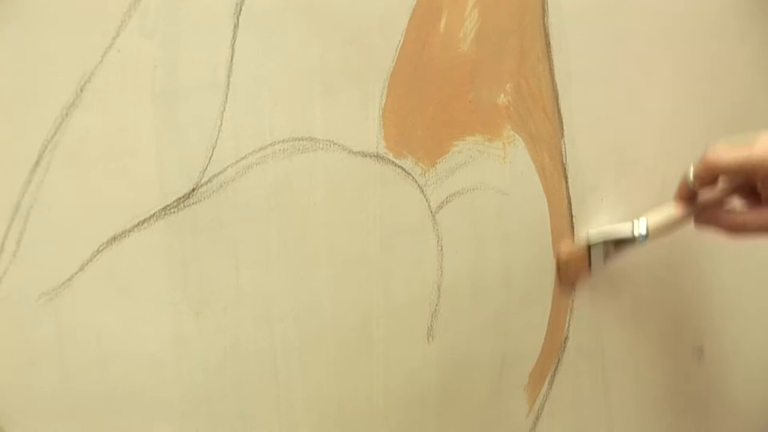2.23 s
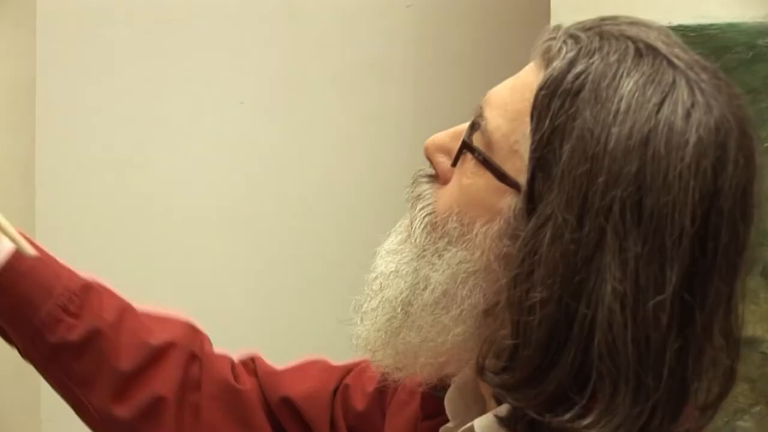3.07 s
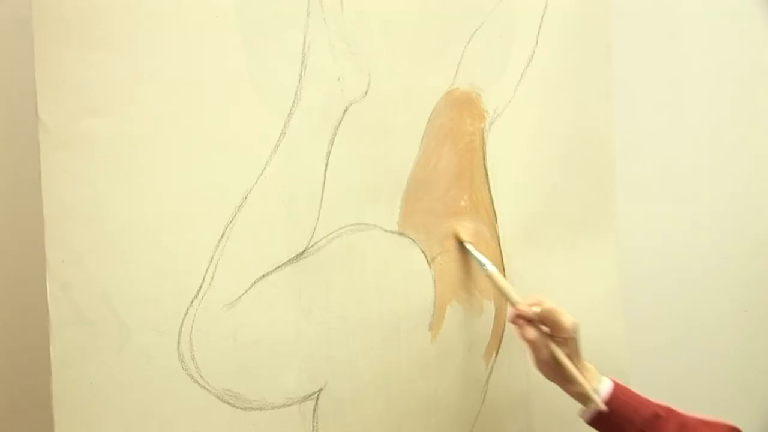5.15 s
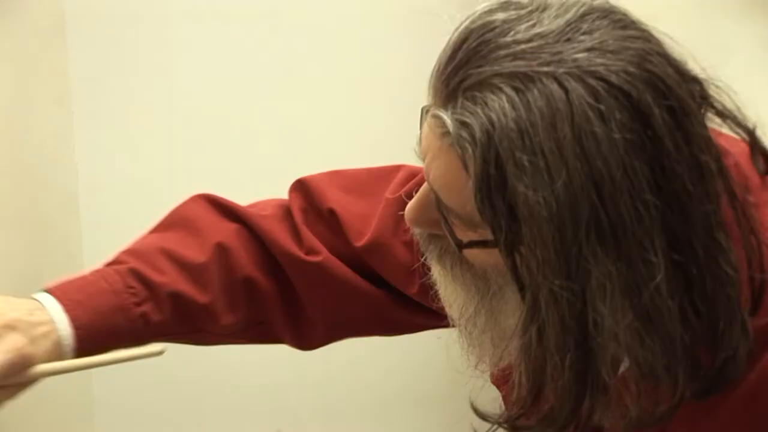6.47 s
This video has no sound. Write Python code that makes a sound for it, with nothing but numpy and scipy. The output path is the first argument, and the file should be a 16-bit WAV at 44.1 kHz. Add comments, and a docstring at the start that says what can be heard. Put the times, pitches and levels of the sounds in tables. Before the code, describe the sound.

Close, dry mono sound of painting on a sheet of paper. Soft brushing swishes come first, around a small handle clatter and deep bumps of the easel. After about three seconds the brush scrubs rapidly to and fro, scratchy and bright, the sheet droning faintly. A softer passage follows, then the loudest brisk strokes, with taps and low thuds, before it falls nearly quiet. Faint room air stays underneath.

```python
"""First come slow, soft brush strokes over a low rumble, with one short rattle; quicker, louder strokes follow.
A bristle brush scrubs paint to and fro over paper on an easel in a quiet studio, close to one microphone.
Thousands of bristle slips, made from uneven noise, hiss, scrape and shake the sheet, which drones in its modes.
Short pushes make the taps of the landing brush and the rattle of its handle, by ringing resonances.
The easel rumbles low when pushed: a wandering low tone plus noise passed through its resonances."""
import sys
import numpy as np
from scipy import signal
from scipy.fft import rfft, irfft
from scipy.io import wavfile
from scipy.ndimage import uniform_filter1d

SR = 44100
rng = np.random.default_rng(int(sys.argv[2]) if len(sys.argv) > 2 else 0)


def output_pcm(signal):
    """Save a mono or channel-first signal as 16-bit PCM at the path in sys.argv[1].

    Samples are clipped to [-1, 1] before scaling.
    """
    pcm = np.clip(np.atleast_2d(signal).T, -1, 1) * 32767
    wavfile.write(sys.argv[1], SR, np.round(pcm).astype(np.int16))


def invert_db(x):
    """Field ratio 10**(x/20) for x, a level in decibels (scalar or array-like)."""
    u = np.asarray(x, float) / 20
    return 10 ** u


N = 298998  # length in samples

# colour of the studio's air and microphone hiss: (frequency [Hz], level per Hz [dB])
STUDIO_COLOUR = [(88, -53), (150, -2.5), (240, -7.5), (315, -7.5), (589, -9), (888, -17), (16000, -26.5)]
# easel legs, the low resonances: (centre [Hz], width [Hz], gain [dB])
LEG_MODES = [(30, 13.7, 3.5), (44, 16, -0.5), (60, 36, -4), (78, 36, -5.5)]
# easel frame, the higher resonances: (centre [Hz], width [Hz], gain [dB])
FRAME_MODES = [(97, 32.4, -0.5), (139, 61, -0.5), (181.4, 62, -1.5), (239, 64, -11)]
# steady rocking while the painter leans in: (time [s], sway drive [dB], frame relative to sway [dB])
LEAN = [(0, -49, -8.5), (.7, -61.5, -4), (1.5, -59, -14), (2.1, -63, -15), (3.15, -66.5, -11),
        (3.3, -57, -12), (3.6, -53.5, -17.5), (3.95, -48.5, -17.5), (4.35, -58.5, -1), (4.5, -51.5, -15),
        (4.9, -53.5, -15), (5.2, -53, 0), (5.5, -50.5, -19), (5.8, -50.5, -13.5), (6.78, -58, -5.5)]
# shoves on the easel:
# (start [s], sway drive [dB], frame relative to sway [dB], rise [s], time to fall by 60 dB [s])
SHOVES = [(0.02, -52, -4.5, 0.027, 1.3), (.24, -40.5, 5, .065, 0.25), (.45, -59, -10, 0.027, 0.68),
          (.93, -65, -10, .05, .9), (1.168, -31, -8.5, 0.025, 0.5), (1.25, -26.5, -33, 0.013, 0.25),
          (1.36, -38.5, -16, 0.024, 0.74), (1.43, -41.5, -26, 0.014, 0.41), (1.6, -55.5, -11.5, .05, 2.5),
          (4.08, -45.5, -10, .02, 0.23), (4.64, -41.5, -10, 0.011, 0.34), (5.868, -30.5, -9.5, 0.017, 0.33),
          (5.97, -47, -6.5, .03, 1.6), (6.21, -44.5, -13.5, 0.025, 1.2), (6.29, -45.5, -1.5, 0.011, 0.25),
          (6.385, -41.5, -7, 0.016, 0.22), (6.5, -53.5, -24, 0.028, 2)]
# resonances of the wooden handle: (centre [Hz], width [Hz], gain [dB])
HANDLE_MODES = [(300, 50, 1), (1290, 90, 1), (2100, 110, -1), (2570, 130, -1), (2800, 150, 0),
                (3280, 200, -7), (4050, 280, -8), (4500, 330, -12), (5600, 500, -21)]
# knocks on the handle: (time [s], drive [dB])
KNOCKS = [(.2845, -36), (0.2871, -27.5), (0.29, -33), (.291, -30), (.293, -25.5), (.2955, -50),
          (0.301, -37), (.3035, -29), (.308, -34), (.311, -31.5)]
# resonances of the paper sheet: (centre [Hz], width [Hz], gain [dB])
SHEET_MODES = [(270, 45, -13), (345, 30, -9), (430, 40, -13), (490, 35, -11), (570, 35, -6), (625, 25, 0),
               (715, 35, -1), (775, 40, -7), (1030, 70, -13)]
# moments when the brush lands: (time [s], drive [dB], bristle tick relative to drive [dB])
LANDINGS = [(3.485, -39.5, -12), (3.758, -30.5, -27), (3.783, -31, -9), (4.082, -32.5, -9.5),
            (4.651, -38, -22), (5.079, -49, -4), (5.19, -38, -25), (5.25, -38, -24), (5.476, -48, -18),
            (5.792, -48, -18), (6.248, -44, -25), (6.387, -49, -20), (6.405, -28.5, -16), (6.423, -40, -22),
            (6.705, -27, -31), (6.707, -33, -12), (6.724, -52, -12)]
# one row a stroke: (start [s], end [s], strength [dB], speeding up [s], slowing down [s])
STROKES = [(-0.016, 0.113, -48, 0.016, 0.16), (0.059, 0.398, -52.5, 0.085, 0.19),
           (0.276, 0.601, -51.5, 0.19, 0.11), (0.536, 0.863, -54, 0.11, 0.15),
           (0.767, 1.299, -48.5, 0.21, 0.16), (1.179, 1.537, -49, 0.28, 0.13),
           (1.49, 1.942, -53, 0.092, 0.2), (1.803, 2.27, -50, 0.28, 0.17), (2.201, 2.648, -52, 0.11, 0.16),
           (2.587, 3.112, -51.5, 0.16, 0.31), (3.163, 3.315, -53.5, 0.081, 0.07),
           (3.285, 3.497, -43.5, 0.069, 0.13), (3.454, 3.685, -40, 0.064, 0.16),
           (3.628, 3.767, -41, 0.077, 0.1), (3.742, 3.856, -44, 0.054, 0.077),
           (3.827, 3.914, -45, 0.057, 0.067), (3.895, 3.993, -42, 0.049, 0.071),
           (3.97, 4.079, -42.5, 0.049, 0.09), (4.053, 4.152, -40, 0.059, 0.071),
           (4.113, 4.483, -50, 0.08, 0.11), (4.437, 4.656, -48.5, 0.14, 0.15),
           (4.632, 4.829, -52.5, 0.042, 0.054), (4.788, 5.093, -55.5, 0.081, 0.18),
           (5.07, 5.272, -51.6, 0.018, 0.08), (5.248, 5.309, -37, 0.0043, 0.055),
           (5.289, 5.479, -40, 0.055, 0.11), (5.445, 5.605, -38.5, 0.06, 0.036),
           (5.583, 5.789, -35.5, 0.073, 0.15), (5.762, 5.947, -37.6, 0.052, 0.078),
           (5.919, 6.096, -35.8, 0.042, 0.18), (6.057, 6.263, -42, 0.07, 0.1),
           (6.224, 6.394, -36, 0.038, 0.2), (6.363, 6.438, -43.5, 0.058, 0.036),
           (6.378, 6.642, -48.5, 0.17, 0.21), (6.7, 6.737, -62, 0.006, 0.021),
           (6.708, 6.861, -58.5, 0.047, 0.038)]
# how the brush is held: (time [s], share of flat side against tips [0-1], pressure on the sheet [dB],
# bite of the stiff hairs [dB], extra drive of the low sheet modes from the place on the sheet [dB])
GRIP = [(0, 0.9, -7, 3, 17), (.2, 0.55, -12, 2, 13), (.36, .7, -15, 5.5, 17), (.5, 0.6, -12.5, -0.5, 16.5),
        (.7, 0.76, -12.5, -2, 12.5), (1.1, 0.5, -13, 3.5, 12), (1.35, .65, -12, -3, 9),
        (1.7, 0.4, -10, 0.5, 8), (2.05, 0.4, -28, -2.5, 8), (2.45, 0.8, -11, -2, 5),
        (2.8, 0.33, -28, -4, 8), (3, 0.6, -11, -2.5, 15), (3.25, 0, -9, -9, 3), (3.4, 0.13, -2, -1, -2),
        (3.6, 0.1, 3, 4.5, -1), (3.79, 0, 8, 2, -5.5), (3.95, 0.2, 2.5, 2.5, -0.5), (4.1, 0.3, 6, 1.5, -1),
        (4.18, 0.2, 8.5, 1.5, -2), (4.32, .15, 0.5, 2.5, 1.5), (4.41, 0.6, 8, 2.5, 8.5),
        (4.55, 0.52, -3, 0.5, 6), (4.71, 0.5, 1, 4.5, 6), (4.78, .7, 6.5, 4, 13.5),
        (4.95, 0.4, -1.5, -3.5, 2), (5.1, 0.8, 2.5, 4, 6), (5.19, .5, 10, 7, 3), (5.3, 0.34, 5.5, 0.5, -3),
        (5.4, 0.3, -5.5, 2, -4), (5.55, 0.2, 4, -3, -4), (5.72, .3, -5, -1, -14), (5.82, .3, 1, 0, -6),
        (5.9, 0.33, 9, 5.5, -4), (6.02, .2, 7, 5, 1), (6.13, 0.36, 4.5, 3, -2), (6.3, 0.04, -4.5, 4, 11.5),
        (6.42, 0.85, 7, 4.5, 11), (6.6, 0.3, -15, -4, 5), (6.72, .4, 5, 6.5, 11), (6.78, .4, 3, -1.5, 11)]
# colour of the hiss of the hair tips: (frequency [Hz], level per Hz [dB])
TIP_COLOUR = [(1500, -15), (2500, -10), (3500, -6), (5000, -1.5), (7500, -2), (10500, 1), (14500, 1.2),
              (15700, -7.5)]
# colour of the hiss of the flat side of the brush: (frequency [Hz], level per Hz [dB])
FLAT_COLOUR = [(1500, -4.5), (3000, -20.5), (5300, -5), (6500, -1.5), (7600, 0), (10000, -2), (13000, -6),
               (15700, -4.5)]
# colour of the scrape of the stiff hairs: (frequency [Hz], level per Hz [dB])
SCRAPE_COLOUR = [(300, -11.5), (600, -1.5), (1100, -2), (1800, -3), (2800, -3), (4500, -5.5), (8000, -20.5)]


def unit(x):
    """Scale to rms 1."""
    return x / np.sqrt(np.mean(x ** 2))


def curve(rows):
    """Draw straight lines between the rows of a timed table, one curve a column."""
    s, *columns = np.transpose(rows)
    return [np.interp(np.arange(N) / SR, s, c) for c in columns]


def colour(x, points):
    """Shape a spectrum by (frequency [Hz], level [dB]) points."""
    hz, db = np.transpose(points)
    f = np.arange(N // 2 + 1) * SR / N + 1  # the 1 avoids log(0)
    gain_db = np.interp(np.log(f), np.log(hz), db)
    return irfft(rfft(x) * invert_db(gain_db), N)


def ring(x, modes):
    """Add up resonances, each ringing at its own pitch, with signs alternating."""
    total = 0
    for k, (hz, width, db) in enumerate(modes):
        b, a = signal.iirpeak(hz, hz / width, fs=SR)
        total = total + (-1) ** k * invert_db(db) * signal.lfilter(b, a, x)
    return total


def walk(rate):
    """Wander at random: rate new levels a second, smoothed twice and scaled to rms 1."""
    k = max(int(SR / rate), 1)
    steps = np.repeat(rng.standard_normal(N // k + 1), k)
    smooth = uniform_filter1d(uniform_filter1d(steps, k), k)
    return unit(smooth[:N])


def slips(spread_db, flicker_db, rate):
    """Make dense tiny slips of uneven size, bunching as hairs catch and let go together."""
    size_db = spread_db * rng.random(N) + flicker_db * walk(rate)
    return rng.standard_normal(N) * invert_db(size_db)


def blows(s, db, decay_s, rough):
    """Give short, fading pushes with some random chatter at the given moments."""
    out, t = np.zeros(N), np.arange(1500) / SR
    chatters = rng.standard_normal((len(s), len(t)))
    for start, size, chatter in zip(s, invert_db(db), chatters):
        out[int(start * SR):][:len(t)] += size * np.exp(-t / decay_s) * (1 + rough * chatter)
    return out


def studio():
    """Faint steady air and microphone hiss is coloured noise."""
    return invert_db(-71.5) * unit(colour(rng.standard_normal(N), STUDIO_COLOUR))


def easel():
    """The legs rock at a wandering pitch under the brush and each shove; the frame rumbles higher up."""
    t = np.arange(N) / SR
    lean_db, lean_frame_db = curve(LEAN)
    # powers add up, so the lean and the shoves are squared here
    sway_power = invert_db(lean_db + 2.0 * walk(14)) ** 2
    frame_power = sway_power * invert_db(lean_frame_db) ** 2
    for s, db, frame_db, rise, t60 in SHOVES:
        onset = np.clip((t - s) / rise, 0, 1)
        fall_db = 60 * np.maximum(t - s - rise, 0) / t60
        shove_power = (onset * invert_db(db - fall_db)) ** 2
        sway_power = sway_power + shove_power
        frame_power = frame_power + shove_power * invert_db(frame_db) ** 2
    rock_hz = 48 * (1 + 0.2975 * walk(30))
    rock = np.sqrt(2) * np.sin(2 * np.pi * np.cumsum(rock_hz) / SR)
    # a broad second resonance rounds off each rumble
    shake = unit(ring(ring(rng.standard_normal(N), LEG_MODES), [(52.0, 76, 0)]))
    rough = slips(spread_db=-4.7, flicker_db=3.5, rate=30)
    frame = unit(ring(ring(rough, FRAME_MODES), [(140.0, 220, 0)]))
    legs = invert_db(-7) * rock + invert_db(-1.5) * shake
    return np.sqrt(sway_power) * legs + np.sqrt(frame_power) * frame


def rattle():
    """Hard, quick knocks ring the wooden handle and, less, the sheet."""
    push = blows(*np.transpose(KNOCKS), decay_s=0.00006, rough=0.15)
    return invert_db(21.5) * ring(push, HANDLE_MODES) + invert_db(17.5) * ring(push, SHEET_MODES)


def taps():
    """The brush lands: the sheet and the frame ring, with a dry tick of bristle tips."""
    s, db, tick_db = np.transpose(LANDINGS)
    push = blows(s, db, decay_s=0.00025, rough=0.36)
    tick = blows(s, db + tick_db, decay_s=0.0074, rough=1.6)
    tick = signal.sosfilt(signal.butter(1, 1500, "high", fs=SR, output="sos"), tick)
    return invert_db(16.5) * ring(push, SHEET_MODES) + invert_db(9.0) * ring(push, FRAME_MODES) + tick


def strokes(follows, edge, grows_db, leads_s=0):
    """Each stroke speeds up and slows down; neighbours overlap as the brush turns.

    follows: share of the stroke's strength that counts; edge: sharpness of its rise and fall;
    grows_db: growth from start to end; leads_s: how early it comes. A -50 dB stroke has gain 1 halfway."""
    t, power = np.arange(N) / SR + leads_s, 1e-12
    for s, end, db, rise, fall in STROKES:
        ramps = np.clip([(t - s) / rise, (end - t) / fall], 0, 1)
        speed = np.prod(np.sin(np.pi / 2 * ramps), axis=0)
        along = np.clip((t - s) / (end - s), 0, 1) - 0.5
        gain = invert_db(follows * (db + 50) + grows_db * along)
        power = power + (gain * speed ** edge) ** 2
    return np.sqrt(power)


def sheet(drag_gain, low_db):
    """The drag shakes each mode of the sheet more or less as the brush moves across it."""
    drag = slips(spread_db=12.5, flicker_db=2.56, rate=38)
    total = 0
    for k, mode in enumerate(SHEET_MODES):
        hz = mode[0]
        # the top modes go the other way from the low ones
        place_share = (hz < 530) - 0.19 * (hz > 680)
        mode_db = 2.1 * walk(12) + low_db * place_share
        # the push is shaped before the mode, so the sheet rings on a little after each stroke
        total = total + invert_db(mode_db) * (-1) ** k * ring(drag * drag_gain, [mode])
    return total / np.std(ring(drag, SHEET_MODES))


def patchy(x, depth_db, rate):
    """Narrow bands swell and fade on their own as other hairs meet the paper."""
    spectrum, octave = rfft(x), np.log2(np.arange(N // 2 + 1) * SR / N + 1)
    total = 0
    for centre in np.arange(8, 14.2, 1 / 6):  # octaves above 1 Hz
        band = np.clip(1 - 6 * abs(octave - centre), 0, 1)
        total = total + invert_db(depth_db * walk(rate)) * irfft(spectrum * band, N)
    return total


def brush():
    """Fine hairs hiss, stiff ones scrape lower and buzz the handle, and the sheet drones."""
    flat, press_db, bite_db, low_db = curve(GRIP)
    hiss_gain = invert_db(-48.64) * strokes(follows=1, edge=2.16, grows_db=-0.3)
    # a stronger stroke rides up on the tips and is brighter
    flat = np.clip(flat - 0.0057 * (20 * np.log10(hiss_gain) + 35.64), 0, 1)
    fine = slips(spread_db=3.5, flicker_db=1.1, rate=200)
    hiss = flat * unit(colour(fine, FLAT_COLOUR)) + (1 - flat) * unit(colour(fine, TIP_COLOUR))

    stiff = slips(spread_db=7.5, flicker_db=0.86, rate=90)
    buzz_db = -28 + 2.5 * walk(4)  # handle buzz relative to scrape
    scrape = unit(colour(stiff, SCRAPE_COLOUR)) + invert_db(buzz_db) * unit(ring(stiff, HANDLE_MODES))
    scrape_gain = invert_db(-56 + bite_db) * strokes(follows=0.26, edge=1.42, grows_db=2.5)
    hairs = hiss_gain * hiss + scrape_gain * scrape

    # the sheet takes the push before the hairs slide
    drag_gain = invert_db(-57.5 + press_db) * strokes(follows=0.32, edge=1.42, grows_db=6, leads_s=0.012)
    return patchy(hairs, depth_db=2.18, rate=25) + sheet(drag_gain, low_db)


def scene():
    """One microphone feeds both channels."""
    mono = studio() + easel() + rattle() + taps() + brush()
    return np.array([mono, mono])


def top_cut(x):
    """Nothing passes above the cut-off."""
    return signal.sosfilt(signal.butter(12, 16520, fs=SR, output="sos"), x)


def record(dry):
    """The recorder drops the deepest bass, below 21 Hz, and the top, above 15830 Hz."""
    no_rumble = signal.sosfilt(signal.butter(2, 21, "high", fs=SR, output="sos"), dry)
    mix = signal.sosfilt(signal.ellip(12, 0.2, 80, 15830, fs=SR, output="sos"), no_rumble)
    return top_cut(mix)


dry = scene()
out = record(dry)
output_pcm(out)
```